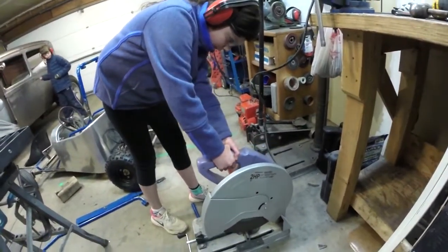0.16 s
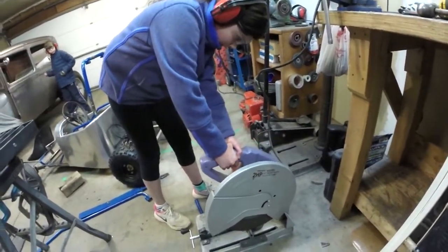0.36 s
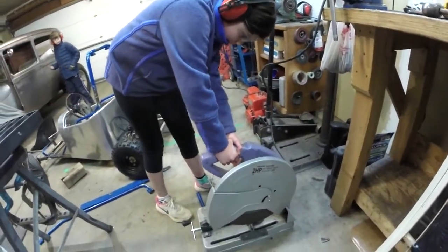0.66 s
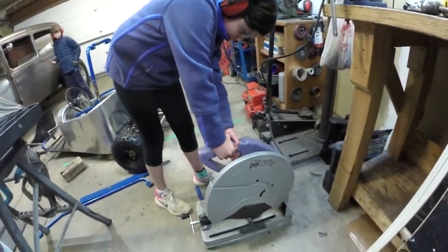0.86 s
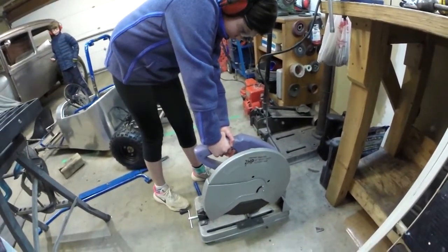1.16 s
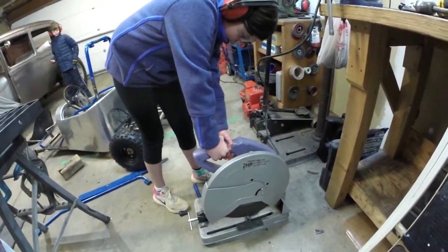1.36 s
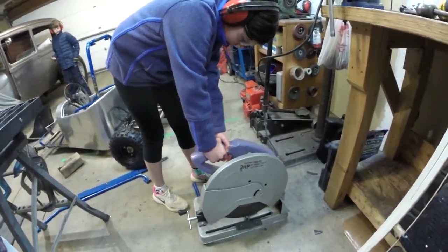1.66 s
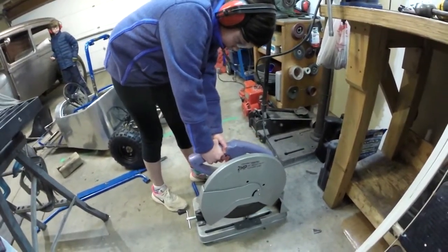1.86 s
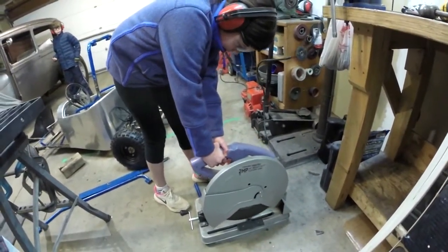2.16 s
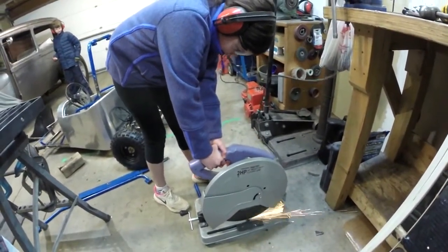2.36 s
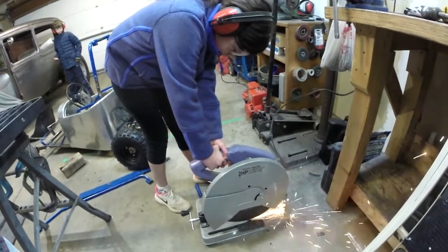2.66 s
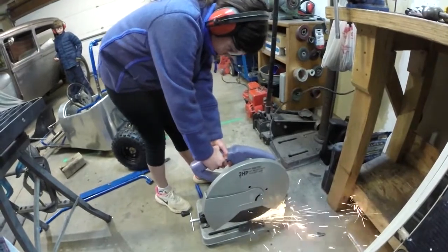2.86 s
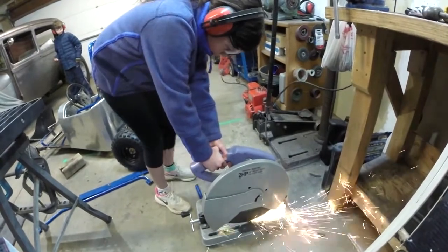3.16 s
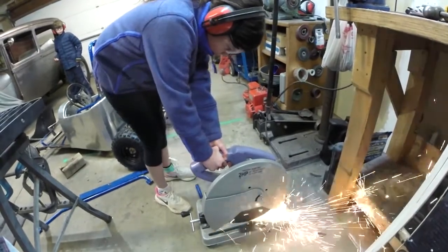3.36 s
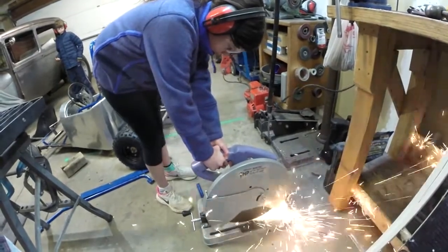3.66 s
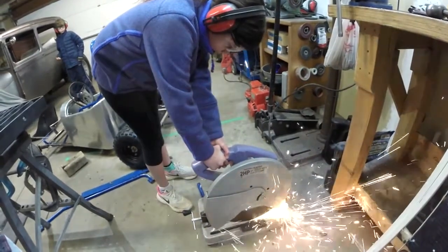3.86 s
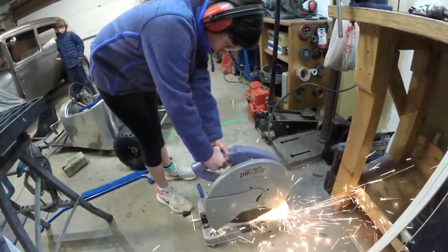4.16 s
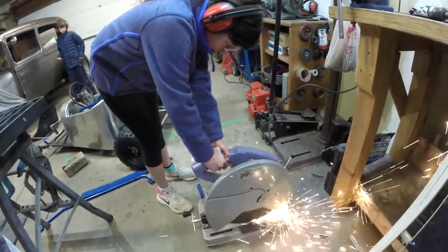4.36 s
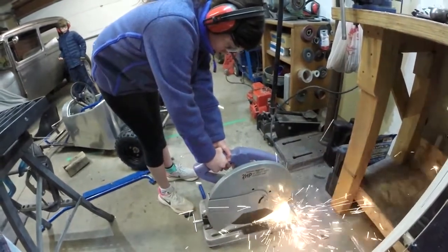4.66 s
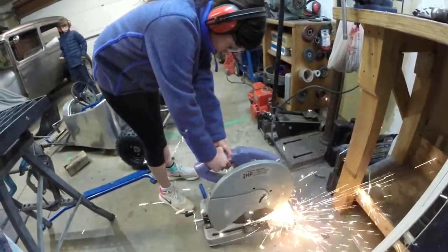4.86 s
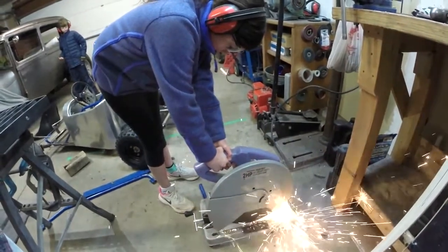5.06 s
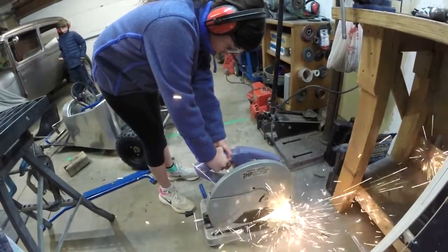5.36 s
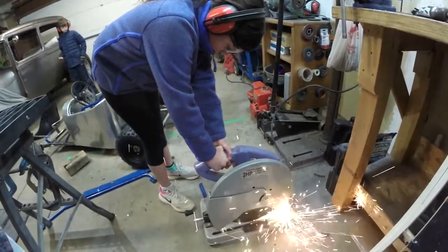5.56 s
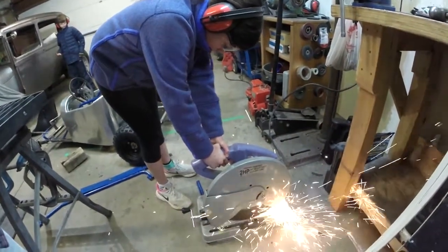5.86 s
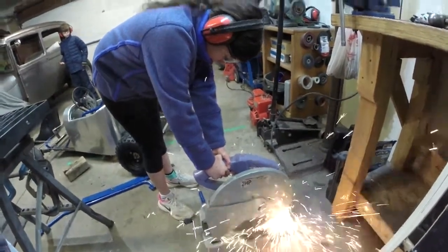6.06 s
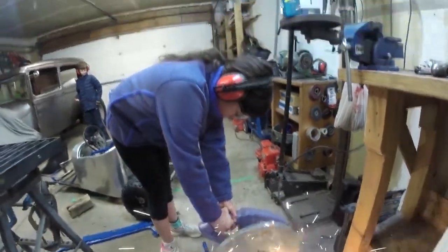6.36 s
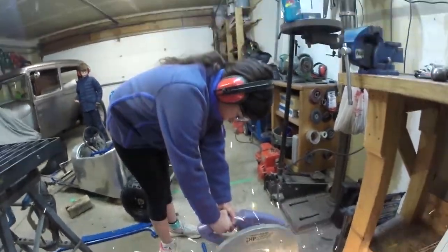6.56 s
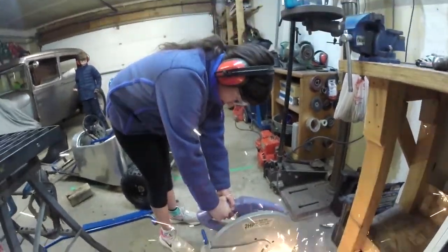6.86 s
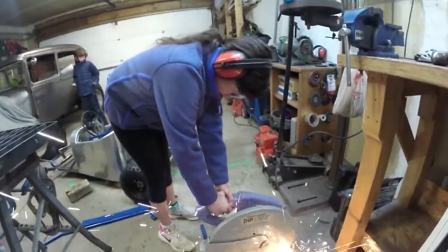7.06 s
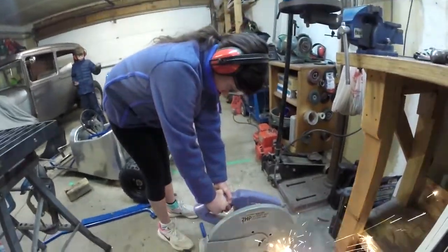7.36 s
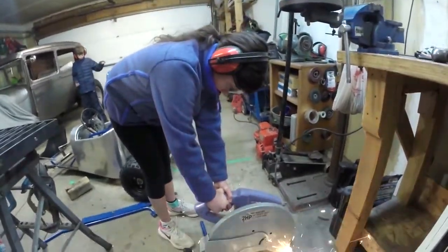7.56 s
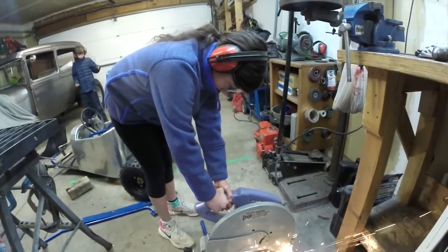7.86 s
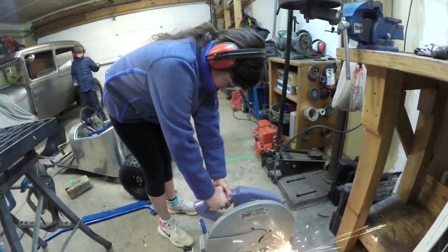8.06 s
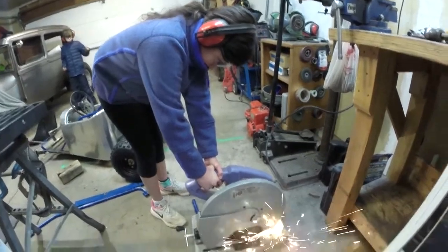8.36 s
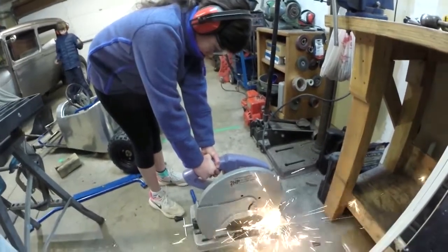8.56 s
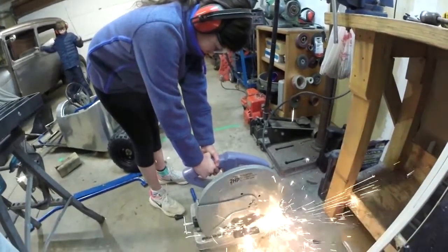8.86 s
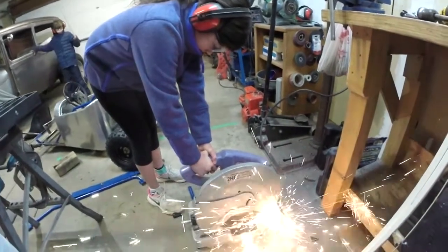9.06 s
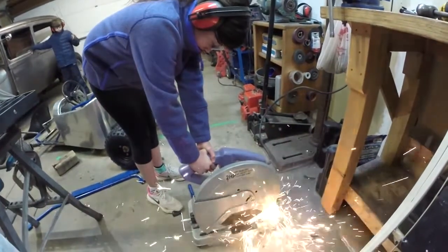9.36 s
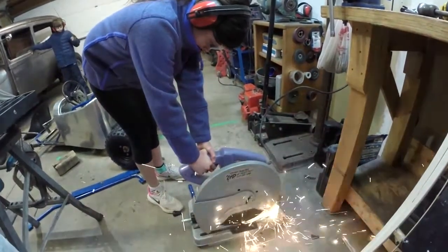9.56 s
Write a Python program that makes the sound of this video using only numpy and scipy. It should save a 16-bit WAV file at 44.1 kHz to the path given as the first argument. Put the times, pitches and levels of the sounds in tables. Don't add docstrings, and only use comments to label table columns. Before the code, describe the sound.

Close in a garage, an abrasive cut-off saw runs up with a climbing hum, fan roar and gear whine for over two seconds. The wheel touches steel with a thin high ring, then a gritty bright grinding grows as the motor pitch sags. Later the cut gets louder, with brief sharp squeals. A single camera microphone, mono, dry, with dull extreme top and slightly crumbled faint detail.

```python
import sys
import numpy as np
from scipy import signal
from scipy.fft import rfft, irfft, next_fast_len
from scipy.io import wavfile
from scipy.ndimage import uniform_filter1d

SR = 44100
rng = np.random.default_rng(int(sys.argv[2]) if len(sys.argv) > 2 else 0)


def store_pcm(level_fs):
    pcm = np.round(np.clip(level_fs, -1, 1) * 32767).astype(np.int16)
    wavfile.write(sys.argv[1], SR, np.atleast_2d(pcm).T)


def to_linear_factor(level_db):
    exponent = np.asarray(level_db, float) / 20
    return 10 ** exponent


N = 428652
TIME = np.arange(N) / SR
FRAME_S = np.arange(int(np.ceil(N / 512)) + 1) * 512 / SR
BIN_HZ = np.fft.rfftfreq(2048, 1 / SR)
GEAR = 6 / 40
TOUCH_S = 2.41


def evened(x):
    return x / np.sqrt(np.mean(x ** 2) + 1e-20)


def curve(rows, column, t=TIME):
    rows = np.transpose(rows)
    return np.interp(t, rows[0], rows[column])


def peak(hz, centre_hz, width_hz):
    return 1 / (1 + (2 * (hz - centre_hz) / width_hz) ** 2)


def colour(points, modes):
    point_hz, point_db = np.transpose(points)
    smooth_db = np.interp(np.log(BIN_HZ + 1), np.log(point_hz + 1), point_db)
    lift = 1 + sum((to_linear_factor(2 * db) - 1) * peak(BIN_HZ, hz, width) for hz, width, db in modes)
    return evened(to_linear_factor(smooth_db) * np.sqrt(lift))[:, None]


def drift(shape, across, along):
    field = rng.standard_normal(shape[::-1]).T
    field = uniform_filter1d(field, int(across), axis=0)
    return evened(uniform_filter1d(field, int(along), axis=1))


def to_bins(x):
    return signal.stft(x, SR, nperseg=2048, noverlap=1536)[2]


def from_bins(bins):
    return signal.istft(bins, SR, nperseg=2048, noverlap=1536)[1][:N]


def shaped(x, gain, patchy_db):
    bins = to_bins(x)
    patches = to_linear_factor(patchy_db * drift(bins.shape, 8.3, 40))
    return from_bins(bins * gain * patches)


def tones(turns, orders, waver_db):
    wavers = drift((len(orders), len(FRAME_S)), 1, 8)
    out = np.zeros(N)
    for (multiple, db), waver in zip(orders, wavers):
        level = to_linear_factor(db + waver_db * np.interp(TIME, FRAME_S, waver))
        out += level * np.sqrt(2) * np.sin(2 * np.pi * multiple * turns)
    return out


def resonate(x, hz, width):
    b, a = signal.iirpeak(hz, hz / width, SR)
    once = signal.lfilter(b, a, x)
    return evened(signal.lfilter(b, a, once))


# time_s, share_kept (0-1)
REPEAT = [
    (0, .2),
    (2.4, .2),
    (3, .86),
    (6.2, .88),
    (6.5, .93),
    (7.15, .93),
    (7.4, .88),
    (9.72, .9),
]


def rim(turns, line_db, band_db):
    size = 768
    count = next_fast_len(int(turns[-1]) + 2)
    kept = curve(REPEAT, 1, np.interp(np.arange(count), turns, TIME))
    rows = rng.standard_normal((count, size))
    for k in range(1, count):
        rows[k] = kept[k] * rows[k - 1] + np.sqrt(1 - kept[k] ** 2) * rows[k]
    spectrum = rfft(rows.ravel())
    chance = rng.standard_normal((2, size))
    order_db = line_db * chance[0] + band_db * evened(uniform_filter1d(chance[1], size=5))
    order = np.arange(len(spectrum)) / count
    spectrum *= to_linear_factor(order_db[np.round(order).astype(int)]) * (order < 340)
    fine = irfft(spectrum, 4 * size * count)
    return evened(np.interp(turns * 4 * size, np.arange(len(fine)), fine))


# time_s, shaft_hz
SHAFT_SPEED = [(0, 376), (.3, 385), (.61, 394.4), (.9, 401), (1.22, 405.5), (1.83, 411.4), (2.44, 415.8),
               (2.75, 414.5), (3.1, 409.5), (3.5, 396), (3.9, 379.2), (4.1, 371.8), (4.5, 361.3),
               (4.9, 351.2), (5.3, 340.9), (5.7, 332.8), (6.1, 324.1), (6.3, 319.9), (6.5, 317.6),
               (6.7, 316.8), (6.82, 315.6), (7.14, 315.6), (7.3, 320.4), (7.5, 323.7), (8.1, 331.1),
               (8.5, 335.1), (8.7, 334), (8.9, 330.2), (9.1, 324.6), (9.3, 320.6), (9.5, 320), (9.72, 323)]
# time_s, shaft_hum_db, housing_roar_db, gear_whine_db, base_ring_db
MOTOR_LEVELS = [(0.0, -22.5, -19.2, -19, -28.4), (0.27, -20, -17.5, -22.5, -33),
                (0.54, -14.5, -17.5, -22, -26), (0.81, -13.5, -19, -21.5, -30.0),
                (1.08, -14.5, -18.5, -25.5, -23), (1.35, -16, -18.5, -31, -22),
                (1.62, -13.5, -18, -24.5, -15.5), (1.89, -14.5, -20, -31, -23), (2.16, -12, -18, -29, -23),
                (2.43, -13, -20, -27.8, -19), (2.7, -12, -19.5, -29, -24), (2.97, -15, -20, -37, -24),
                (3.24, -17.5, -18.5, -20.5, -30), (3.51, -20.5, -20, -26.5, -38),
                (3.78, -28, -20.5, -21.5, -38), (4.05, -27, -22.2, -25, -29),
                (4.32, -33, -22.5, -24.5, -41), (4.59, -32, -20.5, -23.5, -22),
                (4.86, -23, -22, -25, -30.8), (5.13, -35, -22.5, -23, -33), (5.4, -32, -26.5, -24, -26.3),
                (5.67, -30, -30, -37, -33), (5.94, -31.5, -26.2, -23.5, -25), (6.21, -32, -27, -26, -30),
                (6.48, -41, -26.5, -34, -43), (6.75, -36, -27, -33, -40), (7.02, -42, -26.5, -51, -44),
                (7.29, -32.5, -26.5, -30, -28), (7.56, -33, -28, -27, -26.5),
                (7.83, -30.5, -30, -24.2, -25), (8.1, -29, -31.5, -25.5, -26.5),
                (8.37, -31, -28.0, -29, -26), (8.64, -28.5, -30, -42, -37), (8.91, -34.5, -29, -27, -27.5),
                (9.18, -36, -29.5, -32, -31), (9.45, -28, -26.5, -23.5, -23),
                (9.72, -35.3, -27.5, -29, -35)]
# multiple_of_shaft, level_db (over the hum)
HUM_ORDERS = [(1, -3), (2, -15.5), (3, -19.5)]
# multiple_of_shaft, level_db (over the whine)
TOOTH_ORDERS = [(6, -3)]
# multiple_of_shaft, level_db (over the roar)
BLADE_ORDERS = [(12, -21)]
# pitch_hz, level_db (per Hz)
AIR_NOISE = [(18, -71), (30, -56.5), (350, -16.5), (399, -14.5), (455, -9.5), (532, -12), (606, -16.5),
             (852, -9.5), (1080, -10.5), (1550, -20), (3590, -21.5), (4310, -26.5), (6210, -28),
             (10700, -51), (15500, -88)]
# pitch_hz, width_hz, lift_db
HOUSING_RINGS = [(547, 17.4, 12), (678.6, 16, 12), (1042, 79, 3), (3470, 670, 9.5), (5900, 58, 8.5),
                 (10400, 200, 13)]


def motor(shaft, wheel):
    hum = to_linear_factor(curve(MOTOR_LEVELS, 1) - 0.5) * tones(shaft, HUM_ORDERS, waver_db=-1.1)
    gears = rim(wheel, line_db=2.5, band_db=.3)
    rattle = 0.51 * gears + 0.75 * rng.standard_normal(N)
    air = shaped(rattle, colour(AIR_NOISE, HOUSING_RINGS), patchy_db=2.5)
    air = air + tones(shaft, BLADE_ORDERS, waver_db=4.6)
    base = to_linear_factor(curve(MOTOR_LEVELS, 4) - 3.0) * resonate(rattle, hz=868, width=34)
    mesh_hz = 6 * curve(SHAFT_SPEED, 1, FRAME_S)
    hump = peak(BIN_HZ[:, None], mesh_hz, 160) + 0.21 * peak(BIN_HZ[:, None], 2 * mesh_hz, 180)
    teeth = evened(from_bins(to_bins(gears) * hump))
    whine = to_linear_factor(curve(MOTOR_LEVELS, 3) - 3) * (teeth + tones(shaft, TOOTH_ORDERS, waver_db=-1))
    return hum + to_linear_factor(curve(MOTOR_LEVELS, 2) + 1.5) * air + base + whine


def ringing(wheel, orders, modes, waver_db):
    wavers = drift((len(orders), len(FRAME_S)), 1, 14)
    out = np.zeros(N)
    for k, waver in zip(orders, wavers):
        hz = k * GEAR * curve(SHAFT_SPEED, 1, FRAME_S)
        gain = sum(to_linear_factor(db) * peak(hz, mode_hz, width) for mode_hz, width, db in modes)
        level = np.interp(TIME, FRAME_S, gain * to_linear_factor(waver_db * waver))
        out += level * np.sin(2 * np.pi * (k * wheel + rng.random()))
    return np.sqrt(2) * out


# start_s, end_s, start_pitch_hz, end_pitch_hz, width_hz, lift_db
PASSING_RINGS = [(2.41, 3.3, 12150, 12150, 350, 6), (3.2, 5.4, 2240, 2210, 50, 6),
                 (3.6, 6.1, 5190, 5090, 130, 13), (3.2, 6.2, 8150, 8050, 150, 5),
                 (4.6, 6.1, 14000, 13000, 300, 4), (6.3, 7.7, 5820, 5780, 180, 6),
                 (6.0, 8.2, 10550, 10950, 160, 6), (6.3, 7.2, 11500, 11450, 120, 5),
                 (8.1, 8.9, 12500, 12600, 150, 5), (8.9, 9.72, 11950, 11950, 120, 6),
                 (8.8, 9.72, 5550, 5480, 180, 5), (6.4, 7.2, 8400, 8350, 200, 4),
                 (4.5, 5.1, 4200, 4150, 60, 7)]


def passing():
    power = np.ones((len(BIN_HZ), len(FRAME_S)))
    for start, end, hz_start, hz_end, width, db in PASSING_RINGS:
        fade_in, fade_out = (FRAME_S - start) / .05, (end - FRAME_S) / 0.33
        on = np.clip(np.minimum(fade_in, fade_out), 0, 1)
        centre = np.interp(FRAME_S, [start, end], [hz_start, hz_end])
        power += on * (to_linear_factor(2 * db) - 1) * peak(BIN_HZ[:, None], centre, width)
    return np.sqrt(power)


# time_s, rough_noise_db (grinding once the wheel touches),
# brightness_db (top octave), base_shake (0-1), wobble_db, squeal_db
CUT_LEVELS = [(0.0, -27, -14, 0.75, -50, -29), (0.27, -28.5, -13, 0.75, -44.3, -35),
              (0.54, -30, -11, 0.75, -43, -30), (0.81, -30.5, -12.5, 0.75, -43, -29),
              (1.08, -30, -13, 0.75, -43, -33), (1.35, -30, -14.5, 0.75, -42, -35),
              (1.62, -30, -13, 0.75, -41, -41.0), (1.89, -38, -9, 0.75, -46, -46),
              (2.1, -39.7, -5.6, 0.75, -45, -48), (2.39, -39.7, -6, 0.75, -44, -46),
              (2.42, -28.5, -6, 0.6, -42, -42.4), (2.56, -27, -12, 0.64, -39, -42.0),
              (2.7, -31, -8.5, 0.75, -46, -36), (2.97, -29.5, -11.7, 0.2, -40, -29),
              (3.24, -27.5, -9.5, 0.88, -42, -49), (3.51, -26.5, -12.5, 1, -41, -47),
              (3.78, -23, -11, 0.59, -44, -36.7), (4.05, -23, -11.5, 1, -49, -36.7),
              (4.32, -24, -10.5, 0.68, -48, -36.5), (4.59, -22.5, -9.5, 0.6, -43, -32.8),
              (4.86, -23, -10.1, 0.64, -41, -29), (5.13, -22.5, -8.9, 0.68, -40, -32.4),
              (5.4, -21.5, -10.5, 0.9, -43.5, -36), (5.67, -22, -10, 0.7, -45, -40),
              (5.94, -20.7, -8, 0.63, -43, -40), (6.21, -21, -8, 0.52, -53, -42),
              (6.48, -20, -7.5, 0.32, -50, -19), (6.75, -20, -6.6, 0.35, -53, -29),
              (7.02, -20.5, -7.5, 0.22, -52.6, -22), (7.29, -21, -7, 0.33, -46, -26),
              (7.56, -19.5, -8, 0.56, -39.5, -34), (7.83, -17.5, -8.5, 0.87, -42, -26),
              (8.1, -18.5, -8.5, 0.72, -49, -18.5), (8.37, -20.5, -7.5, 0.32, -44, -35),
              (8.64, -18.5, -8.5, 0.7, -47, -37), (8.91, -18, -8, 0.55, -48, -17.5),
              (9.18, -19.5, -7, 0.53, -52, -34), (9.45, -19, -6.5, 0.36, -46, -22),
              (9.72, -17.5, -8.5, 0.43, -45, -34)]
# pitch_hz, level_db (per Hz)
GRIT_NOISE = [(530, -38), (900, -22), (1350, -11), (2020, -9), (2570, -5), (3580, -4.5), (4660, -12),
              (6270, -2), (6730, -6.5), (13000, -16), (15500, -22.5)]
# pitch_hz, width_hz, lift_db
STEEL_RINGS = [(2076, 72, 11.5), (2830, 27, 5), (3070, 110, 6.5), (3706, 43, 8), (4075, 43, 8),
               (5490, 80, 7.5), (6120, 51, 4), (7500, 55, 8.5), (8100, 180, 5.5), (9520, 60, -5),
               (11030, 49, 5.5)]
# pitch_hz, width_hz, level_db
BENCH_RINGS = [(57, 13, -9), (109.6, 9.8, -1.5), (162.4, 37, -3.5), (215, 22, 2.5)]
# pitch_hz, width_hz, level_db
BASE_RINGS = [(327.3, 18.7, -24), (477, 16, -27), (548, 76, -33.5), (681, 65, -31), (861.6, 23, -22.5)]
SQUEAL_HZ, SQUEAL_WIDTH_HZ = 6255, 60


def grinding(wheel):
    cutting = TIME > TOUCH_S
    octaves = np.clip(np.log2((BIN_HZ + 1) / 6000), -1, 1.2)[:, None]
    brightness = to_linear_factor(octaves * (curve(CUT_LEVELS, 2, FRAME_S) + 10))
    gain = colour(GRIT_NOISE, STEEL_RINGS) * brightness * passing()
    throb = 1 + 0.068 * np.cos(2 * np.pi * wheel) + 0.027 * np.cos(4 * np.pi * wheel)
    grit = rim(wheel, line_db=1.8, band_db=.4)
    tear = throb * (grit + 0.38 * rng.standard_normal(N))
    tear = to_linear_factor(curve(CUT_LEVELS, 1) + 2.0) * shaped(evened(tear), gain, patchy_db=1.12)
    wobble = to_linear_factor(curve(CUT_LEVELS, 4)) * ringing(wheel, range(1, 5), BENCH_RINGS, waver_db=2.5)
    shake = curve(CUT_LEVELS, 3) ** 2 * cutting * ringing(wheel, range(5, 19), BASE_RINGS, waver_db=3.5)
    rough_squeal = 0.49 * resonate(grit, SQUEAL_HZ, SQUEAL_WIDTH_HZ)
    pure_squeal = ringing(wheel, [132], [(SQUEAL_HZ, SQUEAL_WIDTH_HZ, -1.5)], waver_db=-4.0)
    squeal = to_linear_factor(curve(CUT_LEVELS, 5)) * cutting * (rough_squeal + pure_squeal)
    return tear + wobble + shake + squeal


def touch():
    hz, level_db, fade_s = 12060, -47, .4
    t = np.maximum(TIME - TOUCH_S, 0)
    rough = 1 + .6 * evened(uniform_filter1d(rng.standard_normal(N), size=150))
    return to_linear_factor(level_db - 60 * t / fade_s) * (t > 0) * rough * np.sin(2 * np.pi * hz * t)


def scene():
    shaft = np.cumsum(curve(SHAFT_SPEED, 1)) / SR
    wheel = GEAR * shaft
    saw = motor(shaft, wheel) + grinding(wheel) + touch()
    return np.array([saw, saw])


# frame (1024 samples at 48 kHz), band_limit_db (over nearby tones), frame_limit_db (over the frame)
LOST_DETAIL = [(16, 3, -40), (39, 3, -40), (57, 2, -30), (67, 3, -40), (93, 2, -30), (96, 3, -30),
               (98, 1, -30), (101, 0, -30), (103, 2, -6), (104, 3, 0), (105, 2, -6), (108, 3, -15),
               (111, 3, -20), (130, 3, -20), (146, 4, -30), (150, 4, -30), (197, 5, -30), (220, 5, -30),
               (280, 6, -20), (308, 5, -20), (343, 6, -20), (356, 1, -20), (357, 3, -1), (358, 3, -1),
               (362, 5, -20), (366, 0, -20), (367, 5, -8), (371, 5, -20), (378, 3, -10), (379, 4, -8),
               (383, 5, -20), (405, 6, -20), (415, 3, -2), (416, 4, 4), (417, 4, 4), (418, 3, 0),
               (421, 3, -1), (422, 3, -1), (425, 5, -20), (443, 4, -10), (444, 1, -10), (446, 6, -20),
               (450, 5, -20), (455, 6, -20)]


def starved(x):
    hop = 941
    n, k = np.arange(2 * hop)[:, None] + .5, np.arange(hop) + .5
    window = np.sin(np.pi * n / (2 * hop))
    basis = window * np.cos(np.pi / hop * (n + hop / 2) * k) * np.sqrt(2 / hop)
    frame, band_db, frame_db = np.transpose(LOST_DETAIL)
    slip = 20 * np.round(frame / 100)
    at = (frame * hop + 141 - slip).astype(int)[:, None] + np.arange(2 * hop)
    padded = np.pad(x, (hop, 3 * hop))
    lines = padded[at] @ basis
    band = np.sqrt(uniform_filter1d(lines ** 2, size=40, axis=1) + 1e-20)
    whole = np.sqrt(np.mean(lines[:, :650] ** 2, axis=1))[:, None]
    masked = band * (whole / band) ** .2
    limit = np.maximum(masked * to_linear_factor(band_db)[:, None], whole * to_linear_factor(frame_db)[:, None])
    weak = abs(lines) < limit
    np.subtract.at(padded, at, (lines * weak) @ basis.T)
    return padded[hop:hop + N]


def top_cut(x):
    return signal.sosfilt(signal.butter(12, 15740, fs=SR, output="sos"), x)


def record(dry):
    ceiling = 1.1
    limited = ceiling * np.tanh(dry[0] / ceiling)
    low_pass = signal.firwin(511, 15200, fs=SR)
    mono = starved(signal.oaconvolve(limited, low_pass, "same"))
    return top_cut(np.array([mono, mono]))


dry = scene()
out = record(dry)
store_pcm(out)
```